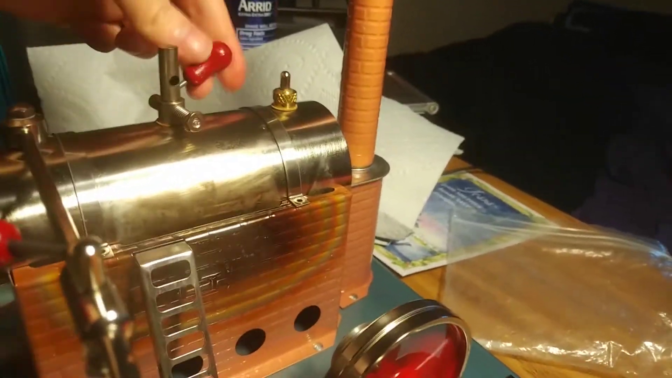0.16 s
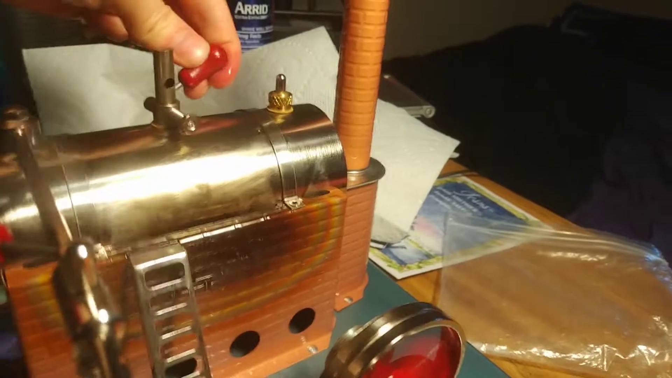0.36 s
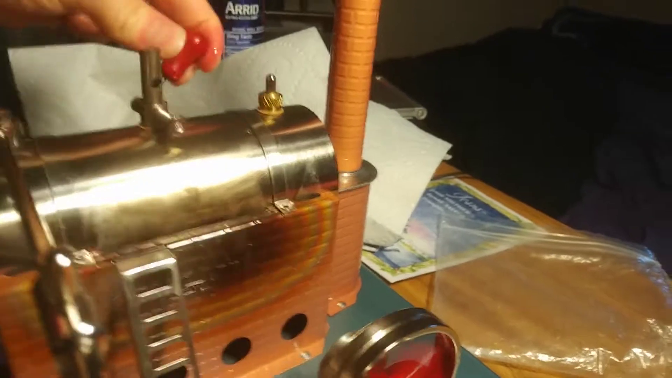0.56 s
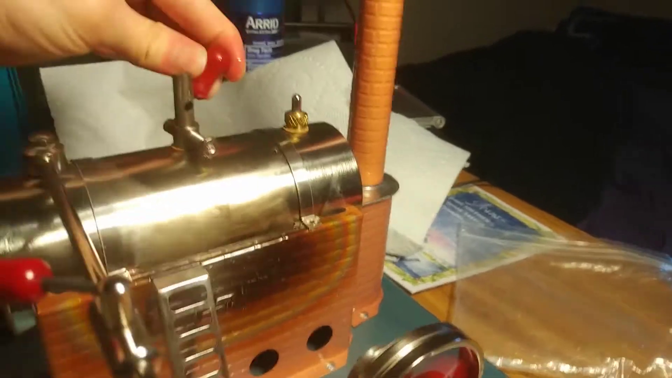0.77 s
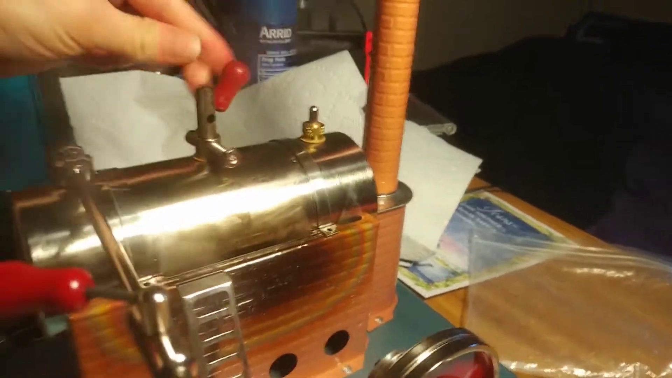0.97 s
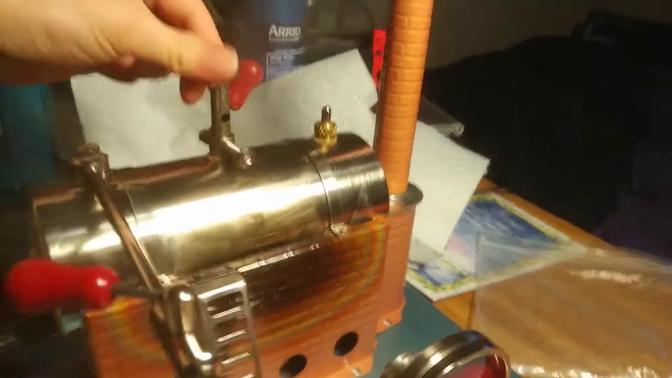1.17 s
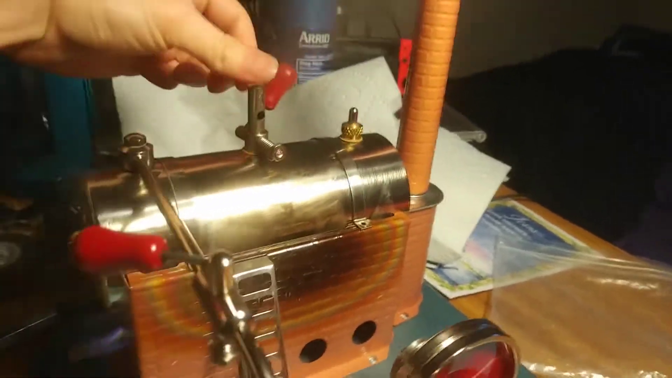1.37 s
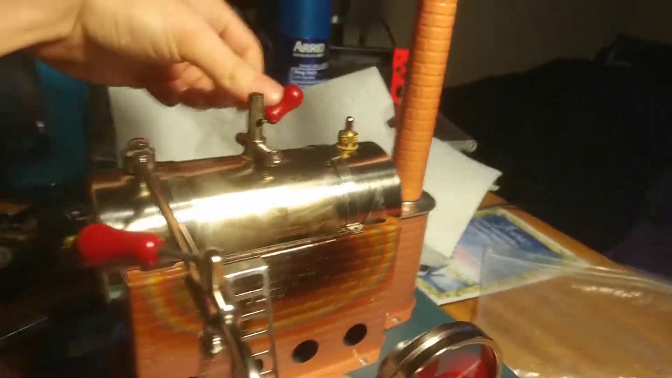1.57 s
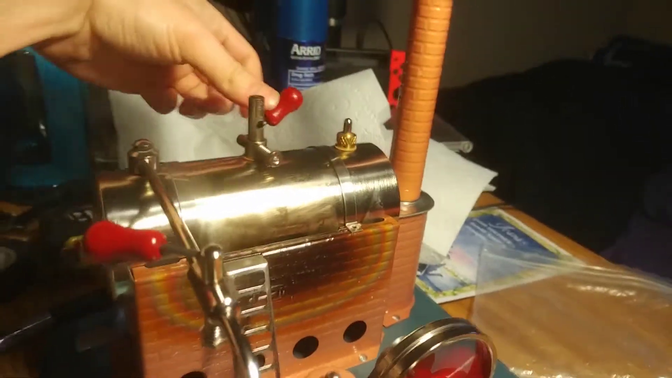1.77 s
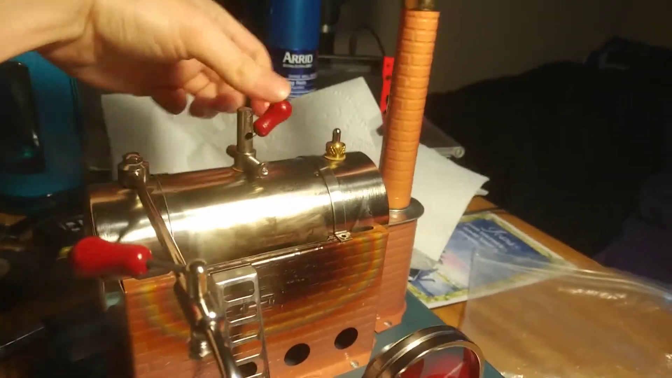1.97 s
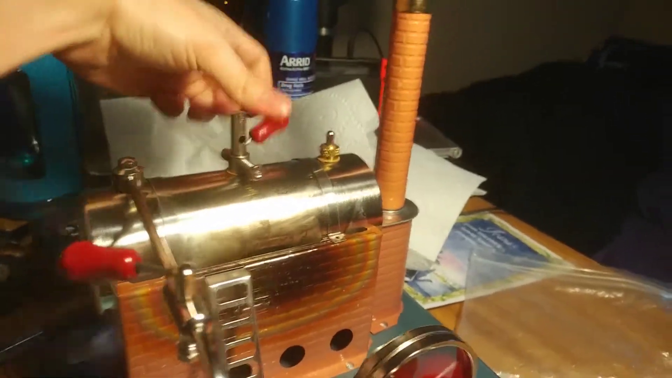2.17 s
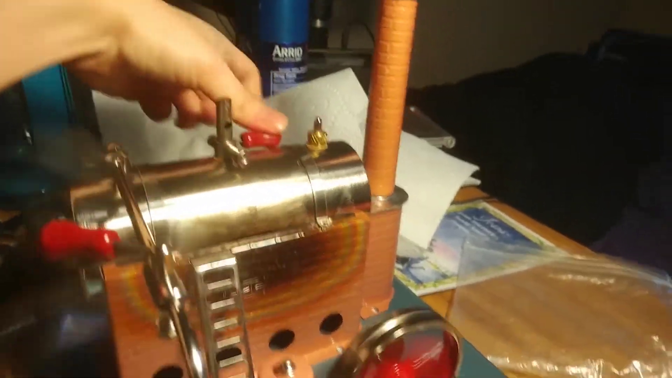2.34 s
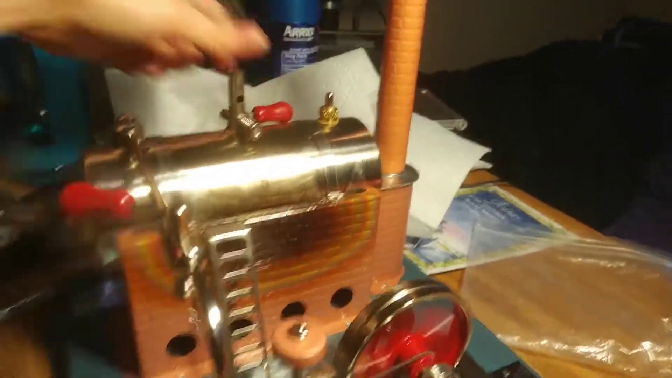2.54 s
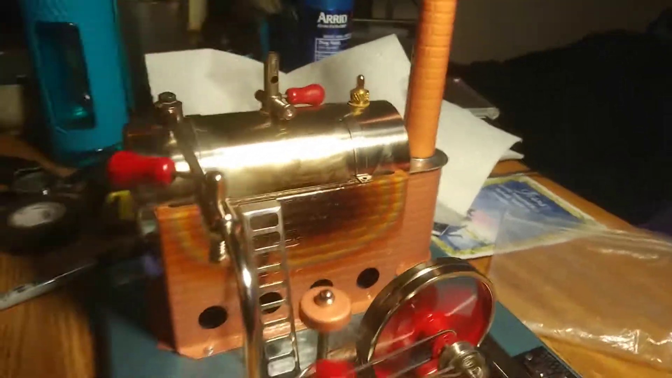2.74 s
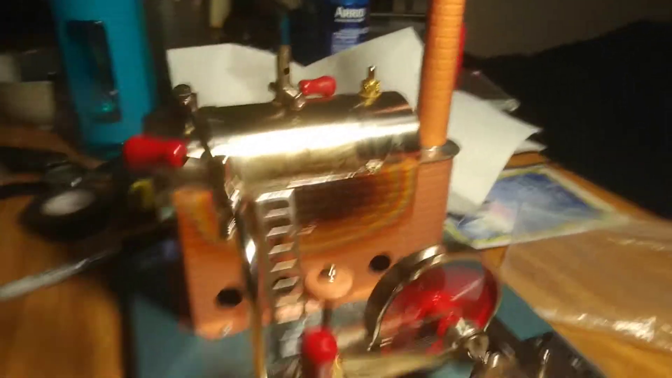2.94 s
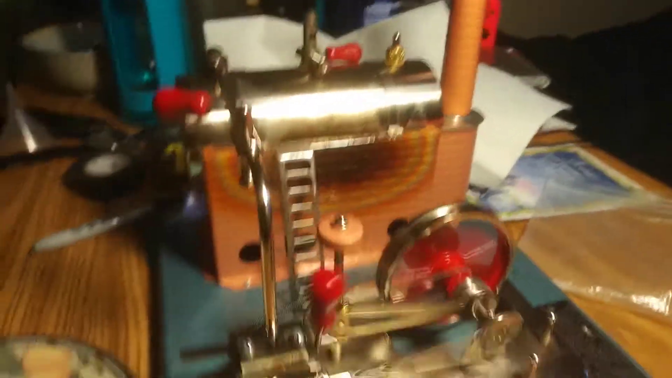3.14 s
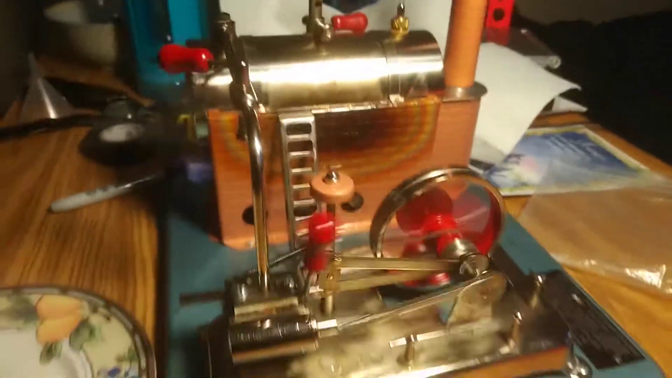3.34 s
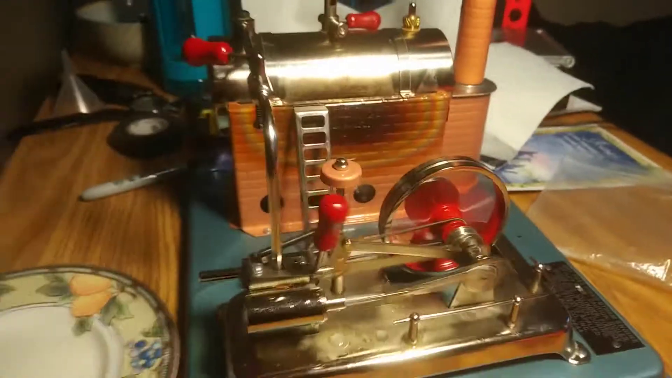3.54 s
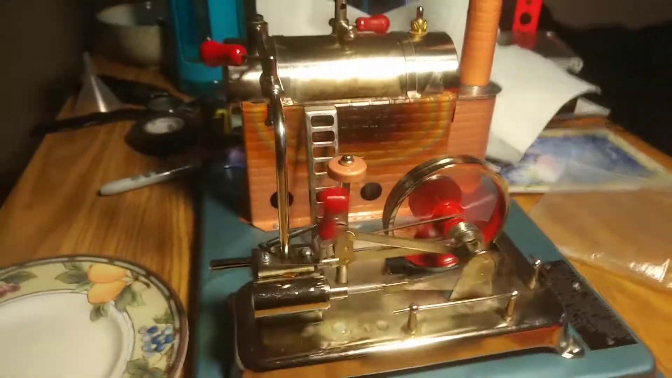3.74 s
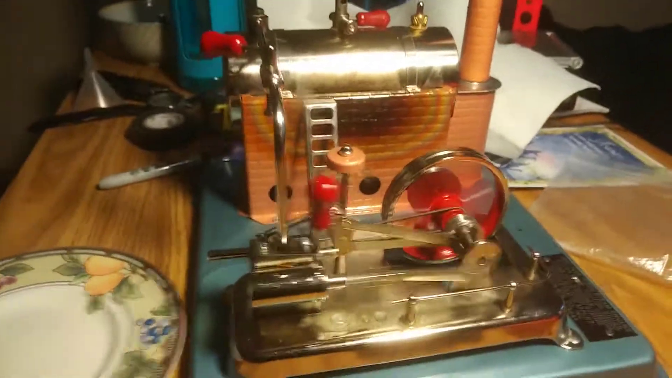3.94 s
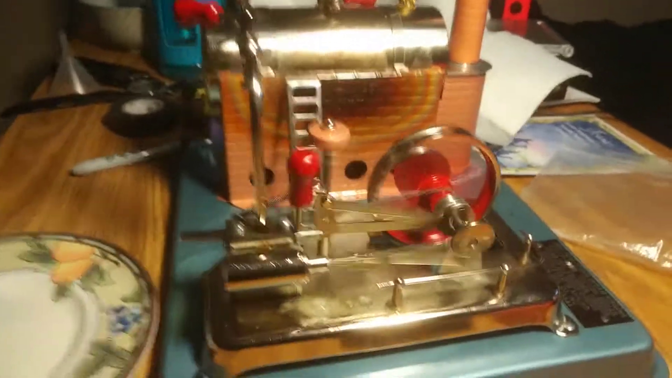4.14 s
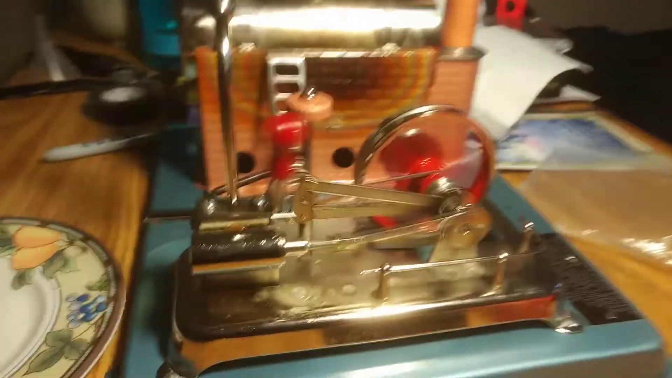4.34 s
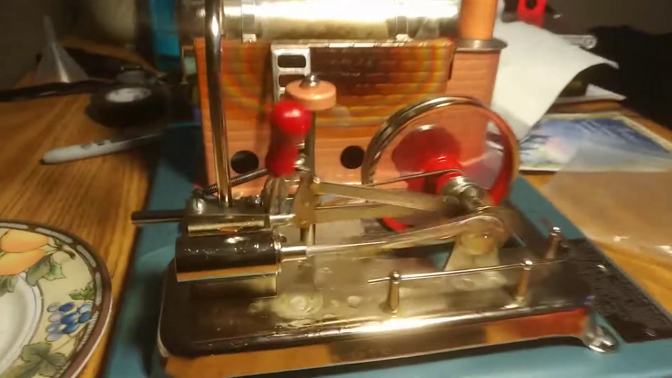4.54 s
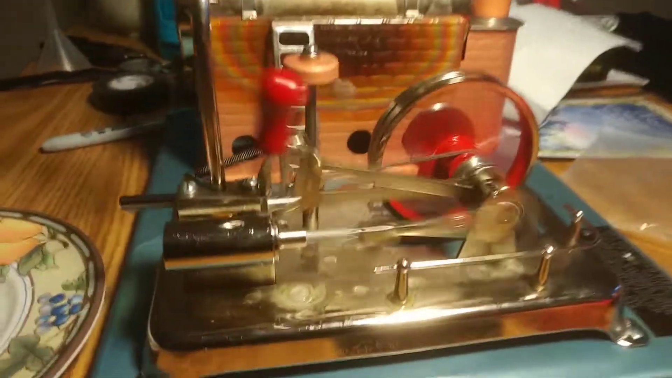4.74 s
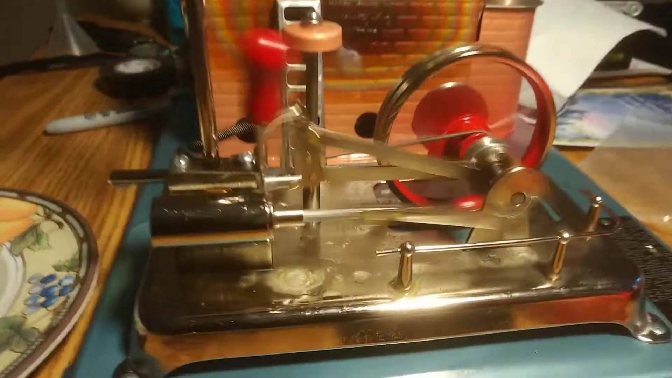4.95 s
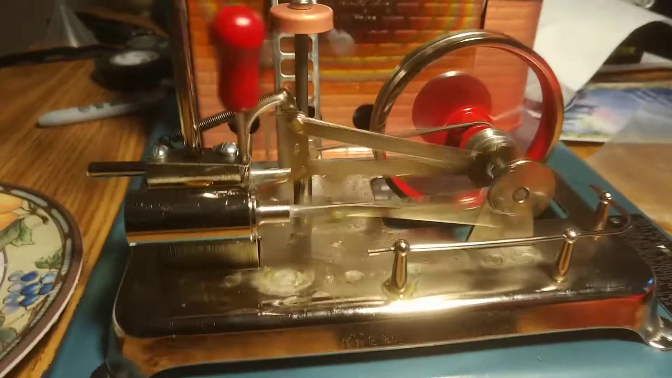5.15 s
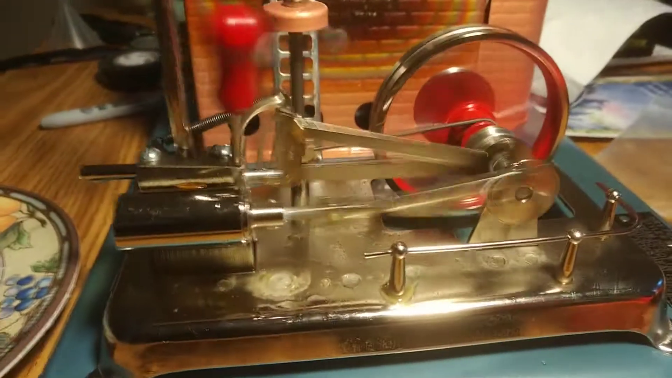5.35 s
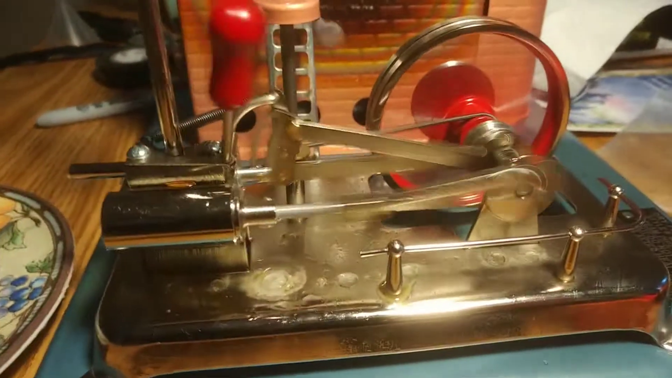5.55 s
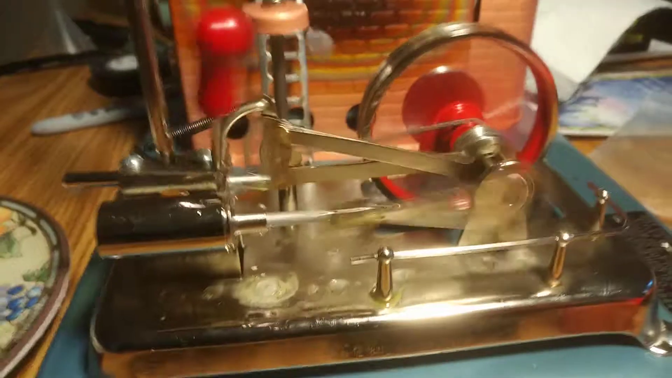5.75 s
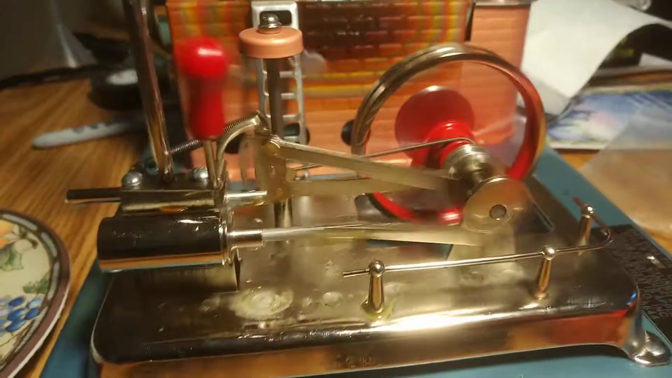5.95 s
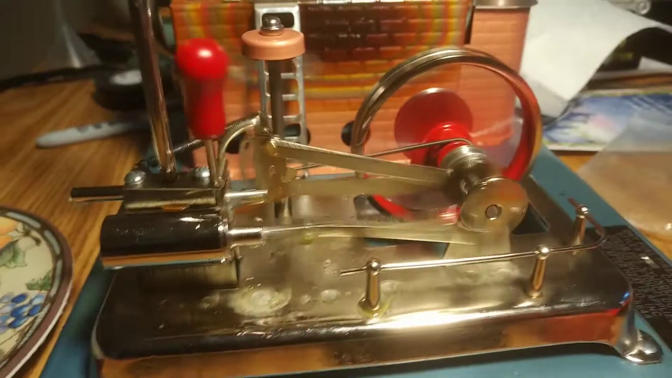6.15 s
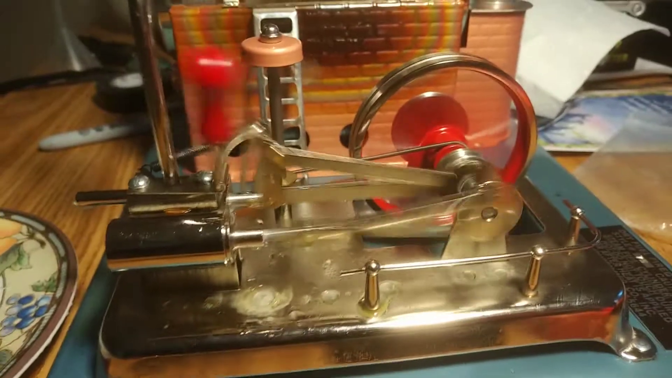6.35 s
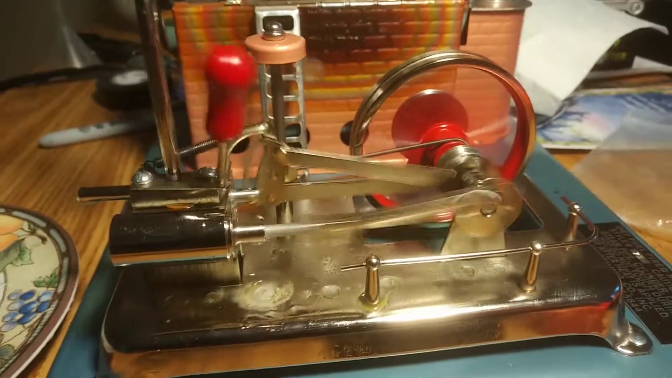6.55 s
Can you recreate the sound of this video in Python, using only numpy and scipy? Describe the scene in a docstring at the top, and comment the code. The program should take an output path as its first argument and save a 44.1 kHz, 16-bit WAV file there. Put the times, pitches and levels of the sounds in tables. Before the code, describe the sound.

A toy steam engine runs on a wooden table, heard very close, with quick, even puffs of steam and light metallic knocks over a faint bubbling boiler and low rumble. It spits a few times, then its whistle gives one loud, shrill, hissing blast of about a second. A lever clicks softly shut, and the engine runs on, its tinny knocking now more prominent.

```python
"""Toy steam engine and whistle

A toy steam engine runs on a wooden table at about eleven turns a second, heard from very close.
Each turn knocks the tin base and lets out two puffs of steam, over a bubbling boiler and table rumble.
A hand opens the whistle: it spits, then the jet drives its pipe into a shrill tone for almost a second,
ducking the mix through a limiter. The lever clicks shut and the engine runs on."""
import sys
import numpy as np
from scipy import signal
from scipy.io import wavfile
from scipy.ndimage import uniform_filter1d, minimum_filter1d

SR = 44100
rng = np.random.default_rng(int(sys.argv[2]) if len(sys.argv) > 2 else 0)


def generate_wav(signal):
    """Clip the signal to [-1, 1] and save it as 16-bit WAV at the path in sys.argv[1]."""
    frames = np.transpose(np.atleast_2d(signal))
    scaled = np.clip(frames, -1, 1) * 32767
    pcm = np.round(scaled).astype(np.int16)
    wavfile.write(sys.argv[1], SR, pcm)


N = 291501
TIME = np.arange(N) / SR


# flywheel tempo, sagging once the whistle has drawn steam: t/s, speed/(turns per s)
FLYWHEEL_SPEED = [(.6, 11.228), (1.4, 11.044), (2.8, 11.102), (3.7, 10.907), (5.2, 11.003), (6, 10.88)]
def flywheel():
    """Turns done since the first knock."""
    speed, = in_time(FLYWHEEL_SPEED)
    turns = np.cumsum(speed) / SR
    first_knock_s = .0266
    return turns - np.interp(first_knock_s, TIME, turns)


# knock pattern of one turn: position/turns, level/dB, timing scatter/s
CRANK_CONTACTS = [(0, 0, .0003), (.155, -9, .001), (.33, -18, .003), (.55, -14, .003), (.66, -10, .0012),
                  (.77, -10, .002)]
# tin base modes: f/Hz, level/dB, t60/s, left-right/dB
BASE_MODES = [(148.6, -37, 0.137, -4), (231, -25.5, 0.071, 5), (275, -10, 0.1, 4), (377, -49, 0.24, 4.5),
              (497, -13, 0.12, 12), (584, -11.5, 0.34, -4), (631.8, 4, 0.08, 1.5),
              (679.7, -9.5, 0.13, -12.5), (790, -45.5, 0.0259, 10), (1034.5, -11, 0.054, 5.5),
              (1085, -11.5, 0.0557, -7), (1242, -52, 0.027, -4.5), (1460, -17.5, 0.046, -15.5),
              (1700, -17.5, 0.028, -6.5), (2250, -15.5, 0.055, -15), (2890, -15, 0.015, -15.5)]
# firebox wall modes: f/Hz, level/dB, t60/s, left-right/dB
FIREBOX_MODES = [(260.8, -6.5, .15, -1), (649, -3, 0.41, 9), (717, 1, 0.055, 16), (829, -6, 0.025, -0.5)]
def crank(knock_db):
    """Play in crank and rod is taken up every turn, knocking the tin base and the firebox wall."""
    turns = flywheel()
    position, level_db, scatter_s = np.transpose(CRANK_CONTACTS)
    starts = np.interp(np.arange(turns[-1]), turns, TIME)
    shape = (len(starts), len(position))
    times = starts[:, None] + position * np.mean(np.diff(starts)) + scatter_s * rng.standard_normal(shape)
    sizes = from_db(level_db + .5 * rng.standard_normal(shape))
    thud = rms_one(metal_body(BASE_MODES, times, sizes, contact_hz=1620))
    # the blow spreads into the plate, whose ring swells over a few milliseconds
    bloom = rms_one(ring(thud, hz=663, t60=0.014))
    thud = rms_one(thud + from_db(-1) * bloom)
    wall = rms_one(metal_body(FIREBOX_MODES, times, sizes, contact_hz=1220))
    wall = wall * from_db(swing(at_boiler=6.5, at_crank=-20))
    # the hardest contact adds a small metallic tick
    tick_envelope = rms_one(soften(clicks_at(starts, sizes[:, 0]), hz=69))
    tick = soften(tick_envelope * noise(AIR_COLOUR, flicker_db=0.5), hz=7100)
    reverb = from_db(-13) * room(thud[0])
    return from_db(knock_db) * (thud + wall + reverb) + from_db(-64) * tick


# stray accents: t/s, level/dB
ROD_KNOCKS = [(2.545, -40), (3.51, -32.5), (3.539, -44), (5.248, -31.5), (5.883, -30.5), (6.19, -34)]
def rod_knocks():
    """Now and then the rod hits harder and rings the tin base."""
    return struck(BASE_MODES, ROD_KNOCKS)


# one puff per stroke: position/turns, level/dB
PUFFS = [(.22, 0), (.67, -4.5)]
# spectrum of wet steam: f/Hz, density/dB
STEAM_COLOUR = [(1500, 3), (3000, -22), (4800, -10), (6200, -17.5), (7600, -5.5), (10000, 3), (13000, 4.5),
                (16000, 2.5)]
def exhaust(exhaust_db):
    """The valve lets out a strong and a weaker puff each turn; droplets make them sputter."""
    rise_s, burst_s = .0045, .005
    tail_share, tail_db_per_s = from_db(-4.5), 210
    speed, = in_time(FLYWHEEL_SPEED)
    turns, power = flywheel(), 0
    for position, db in PUFFS:
        since_s = (turns - position) % 1 / speed
        until_s = (position - turns) % 1 / speed
        # a puff rises and bursts, then the cylinder empties more slowly
        rise = np.exp(-(until_s / rise_s) ** 2)
        burst = (1 - tail_share) * np.exp(-(since_s / burst_s) ** 2)
        tail = tail_share * from_db(-tail_db_per_s * since_s)
        power = power + (from_db(db) * np.maximum(burst + tail, rise)) ** 2
    sharpness = swing(at_boiler=1.3, at_crank=1.0)
    envelope = np.sqrt(power) ** sharpness
    # a sharper puff carries the same steam in less time
    four_turns = round(4 * SR / speed.mean())
    envelope = envelope / np.sqrt(uniform_filter1d(envelope ** 2, size=four_turns))
    sputter = rms_one(from_db(1.06 * drift(380) + 0.97 * drift(18.1)))
    steam = metal_reflections(noise(STEAM_COLOUR, flicker_db=1.8))
    return from_db(exhaust_db) * envelope * sputter * steam


# pitch curve, following the hand on the lever: t/s, f/Hz
WHISTLE_PITCH = [(.635, 4680), (.657, 5140), (.685, 5057), (.707, 5378), (.745, 5156), (.772, 5200),
                 (.81, 5724), (.885, 5754), (.94, 5549), (1.06, 5615), (1.1, 5570), (1.45, 5461)]
# the room's standing waves move the tone between the ears: t/s, left level/dB, left lead/rad
WHISTLE_WANDER = [(.68, -9.5, 1.34), (.78, -9.5, 1.54), (.85, -12, -2), (.945, -5, 2.45), (1.02, -3.5, 0.3),
                  (1.21, -7, 0.45), (1.3, -5, -3), (1.37, -17, -7.5), (1.46, -9, -5)]
def whistle():
    """A short pipe sings on the steam jet: louder when driven sharp, hoarse at low pressure."""
    speaks_s, attack_s, silent_s, release_s = .635, 0.058, 1.497, 0.045
    tone_db, reference_hz, db_per_khz, droop_hz = 3, 5466, 10, 1740
    hz, = in_time(WHISTLE_PITCH)
    left_db, left_lead = in_time(WHISTLE_WANDER)
    dying = ramp(silent_s - release_s, release_s)
    drive = ramp(speaks_s, attack_s) ** 2 * (1 - dying ** 2)
    hz = hz - droop_hz * dying ** 2.9
    envelope = drive * from_db(tone_db + db_per_khz * (hz - reference_hz) / 1000)
    hoarse = np.clip(1 - envelope, 0, 1) ** 2
    jitter_hz = (10 + 170 * hoarse) * drift(475.4)
    phase = 2 * np.pi * np.cumsum(hz + jitter_hz) / SR
    envelope = envelope * from_db((1.34 + 2 * hoarse) * drift(134.1))
    tone = envelope * np.sin(phase)
    # in mid blast the level on the right dips briefly at random
    mid_blast = soften((TIME > .9) & (TIME < 1.22), hz=30.04)
    falter_db = 13 * mid_blast * np.maximum(drift(45) - .5, 0)
    left = from_db(left_db) * envelope * np.sin(phase + left_lead)
    right = from_db(-falter_db) * tone
    octave = envelope * np.sin(2 * phase + drift(100)) * from_db(-40.5 + 3 * drift(30))
    reverb = from_db(-17.5) * pan(-13) * room(tone)
    return np.array([left, right]) + octave + reverb


VALVE_OPEN_S, VALVE_CLOSED_S = 0.55, 1.516
# spectrum of the jet: f/Hz, density/dB
JET_COLOUR = [(1000, -30.5), (2500, -10), (3700, -6.5), (4500, -4.5), (5500, 8), (6500, 2.5), (7500, -2.5),
              (9800, 0), (11200, -6), (12300, 6), (14500, 2), (16000, -3)]
# stereo placement of the jet: f/Hz, left-right/dB
JET_BALANCE = [(1000, 0.5), (3000, -8), (4500, -9.5), (6500, -14), (8200, -8), (9500, -5.5), (13000, -0.5),
               (15000, 5)]
# upper resonances of the pipe: f/Hz, level/dB, t60/s
PIPE_OVERTONES = [(9010, -17, .08), (10980, -16, .03), (11250, -13, .015), (12750, -17, .06),
                  (14250, -15, .015)]
# breathy rushes through the half-open valve: t/s, level/dB, half width/s, f/Hz
VALVE_GASPS = [(0.559, -34, 0.017, 5860), (0.601, -24.5, 0.017, 6025), (.655, -26, 0.03, 4570),
               (0.676, -19.5, 0.032, 5180), (1.493, -25.5, 0.042, 5170)]
def jet():
    """Steam hisses over the whistle's lip and stirs the pipe; it gasps as the valve opens and shuts."""
    opening_s, closing_s = 0.16, .1
    eased_open = 1 - np.exp(-np.maximum(TIME - VALVE_OPEN_S, 0) / opening_s)
    valve = eased_open * (1 - ramp(VALVE_CLOSED_S - closing_s, closing_s))
    pipe = sum(from_db(db) * pipe_noise(hz, t60) for hz, db, t60 in PIPE_OVERTONES)
    hiss = metal_reflections(noise(JET_COLOUR, flicker_db=4, balance=JET_BALANCE)) + pipe
    gasps = sum(from_db(db) * np.exp(-((TIME - s) / width) ** 2) * pipe_noise(hz, t60=0.016)
                for s, db, width, hz in VALVE_GASPS)
    return valve * from_db(-21.5 + 0.88 * drift(143)) * hiss + pan(-12) * low_cut(gasps, hz=3500)


# wet bursts ahead of the whistle: t/s, level/dB, decay/s
SPITS = [(.038, -18, .019), (.108, -27, .014), (.134, -30, .014), (.174, -25.5, .01)]
def spits():
    """Condensed water is blown out of the valve in short bursts."""
    bursts = sum(from_db(db) * ramp(s, 0.0051) * np.exp(-np.abs(TIME - s) / decay)
                 for s, db, decay in SPITS)
    sputter = from_db(1.2 * drift(340))
    return bursts * sputter * noise(STEAM_COLOUR, flicker_db=2.5)


# whistle lever modes: f/Hz, level/dB, t60/s, left-right/dB
LEVER_MODES = [(2820, 7.5, 0.032, -14), (3000, 1, .05, -5), (3600, 4, 0.021, -15), (4380, 6, .015, -11),
               (5440, -2, .03, -23), (7030, -13, .025, -3), (7500, 0, .02, 0)]
# hits on the lever: t/s, level/dB
LEVER_CLICKS = [(2.272, -48), (2.297, -43), (2.306, -45.5), (2.566, -47.5)]
# hit on the boiler: t/s, level/dB
BOILER_BUMPS = [(2.0494, -38.5)]
def hand():
    """The hand bumps the boiler, then the lever clicks shut and settles."""
    return struck(BOILER_MODES, BOILER_BUMPS) + struck(LEVER_MODES, LEVER_CLICKS)


# modes of the boiler shell and fittings: f/Hz, level/dB, t60/s, left-right/dB
BOILER_MODES = [(595, 17, 0.017, 12), (710, -8, 0.069, 5), (1001, 8, 0.088, 6), (1070, 10, 0.0454, -7.5),
                (1210, -16.5, 0.121, -8.5), (1539, -2, 0.074, -9.5), (1695, -1.5, 0.063, -8.5),
                (2292, -1.5, 0.052, -17), (2690, -1.5, 0.0506, -11.5)]
def boil(boil_db, bubbles=5000, right_lag_s=0.00028):
    """Bubbles collapse against the boiler shell; the sound reaches the left ear first."""
    times = rng.uniform(0, N / SR, bubbles)
    sizes = from_db(np.minimum(rng.exponential(1, bubbles), 2)) * rng.choice([-1, 1], bubbles)
    shell = metal_body(BOILER_MODES, times, sizes, contact_hz=1550)
    # small bubbles hardly move the lowest modes
    left, right = from_db(boil_db) * rms_one(low_cut(shell, hz=900))
    return np.array([left, np.interp(TIME - right_lag_s, TIME, right)])


# spectrum of the table's rumble: f/Hz, density/dB
RUMBLE_COLOUR = [(30, -28.5), (42, -37), (63, 6), (95, -9.5), (140, 4), (190, -3.5), (300, -4.5), (450, -9),
                 (630, -1), (830, -12), (1030, -7.5), (1400, -19), (2300, -20.5), (4000, -31.5)]
# hum partials in the wood: f/Hz, level/dB
TABLE_HUM = [(120, -52), (146, -52), (361, -53.5)]
def table_rumble():
    """The running engine shakes the table into a rumble and a wavering hum."""
    rumble = from_db(-39) * noise(RUMBLE_COLOUR, flicker_db=.5)
    hum = sum(from_db(db) * np.sqrt(2) * np.sin(2 * np.pi * hz * TIME + 0.95 * drift(1.4))
              for hz, db in TABLE_HUM)
    return rumble + from_db(1.5 + 2.5 * drift(0.82)) * hum


# spectrum of the airy hiss, also used for the crank's tick: f/Hz, density/dB
AIR_COLOUR = [(1500, 6.5), (3000, 1), (4500, -3), (5550, -10), (6500, 11.5), (10000, -17), (16000, -1.5)]
def leak():
    """A faint bed of hiss; steam seeps through the whistle, less once the lever is pushed home."""
    seating_s, seep_db = (2.1, 2.7), (-55.5, -63)
    seep = from_db(np.interp(TIME, seating_s, seep_db)) * pan(-15.5) * pipe_noise(hz=5525, t60=0.0056)
    return seep + from_db(-52) * noise(AIR_COLOUR, flicker_db=5.5)


# early reflections: delay/s, gain
METAL_REFLECTIONS = [(.00042, 0.14), (.00113, 0.11), (.00187, -.35), (.0031, .3), (.0053, 0.36)]
def metal_reflections(x):
    """Nearby polished metal returns the hiss and combs its treble; the power is kept."""
    out = x.copy()
    for delay_s, gain in METAL_REFLECTIONS:
        lag = max(1, round(delay_s * SR))
        out[:, lag:] += gain * x[:, :-lag]
    return out * np.std(x) / np.std(out)


def room(x, count=20, t60=0.39):
    """Short room tail: feedback delays of unrelated lengths, half of them on each side."""
    out = np.zeros((2, N))
    for k, lag in enumerate((rng.uniform(.007, 0.12, count) * SR).astype(int)):
        loop = x.copy()
        feedback = np.exp(-np.log(1000) * lag / SR / t60)
        for i in range(lag, N, lag):
            loop[i:i + lag] += feedback * loop[i - lag:i][:N - i]
        out[k % 2] += (loop - x) * (-1) ** (k // 2)
    return out / np.sqrt(count)


# stereo width of the noise layers: f/Hz, left-right correlation
NOISE_CORRELATION = [(60, .96), (300, .92), (700, .88), (1400, .1), (3000, 0), (5000, .1), (7000, .55),
                     (15000, .6)]
# their default placement: f/Hz, left-right/dB
NOISE_BALANCE = [(60, 2), (200, 1), (600, 5), (1300, -6.5), (2400, -7), (4400, -12), (8100, -3),
                 (11000, -1.5), (15000, 3)]
def noise(colour, flicker_db, balance=NOISE_BALANCE):
    """Third-octave bands of stereo noise, each with its own level, flicker, pan and width; mid rms 1."""
    edges = 16500 / 2 ** (np.arange(29, -1, -1) / 3)
    out, white = 0, rng.standard_normal((2, 2, N))
    for k, (low, high) in enumerate(zip(edges, edges[1:])):
        hz = np.sqrt(low * high)
        if colour[0][0] < hz < colour[-1][0]:
            band = signal.butter(2, [low, high], "band", fs=SR, output="sos")
            mid, side = signal.sosfilt(band, white[k % 2])
            alike = at_hz(NOISE_CORRELATION, hz)
            pair = np.sqrt(1 + alike) * mid + np.sqrt(1 - alike) * side * [[1], [-1]]
            level_db = at_hz(colour, hz) + flicker_db * drift(21.2)
            out = out + pair * pan(at_hz(balance, hz)) * from_db(level_db)
    return out / np.sqrt(np.mean(out.mean(axis=0) ** 2))


def metal_body(modes, times, sizes, contact_hz):
    """Blows ring a metal part; each meets every mode with a strength of its own."""
    out = 0
    for hz, level_db, t60, side_db in modes:
        strengths = sizes * from_db(level_db + rng.standard_normal(np.shape(sizes)))
        out = out + pan(side_db) * ring(clicks_at(times, strengths), hz, t60)
    return soften(out, contact_hz)


def struck(modes, blows):
    """Single hard blows on a metal part."""
    times, level_db = np.transpose(blows)
    return metal_body(modes, times, from_db(level_db), contact_hz=5000)


def pipe_noise(hz, t60):
    """Turbulence stirring one resonance; rms 1."""
    return rms_one(ring(rng.standard_normal(N), hz, t60))


def ring(clicks, hz, t60):
    """A unit click sets a sine of height 1 ringing."""
    r = np.exp(-np.log(1000) / (t60 * SR))
    w = 2 * np.pi * hz / SR
    return signal.lfilter([0, np.sin(w)], [1, -2 * r * np.cos(w), r * r], clicks + 1e-18)


def clicks_at(times, sizes):
    """A train of single-sample blows."""
    at = np.round(np.ravel(times) * SR).astype(int)
    inside = (at >= 0) & (at < N)
    return np.bincount(at[inside], np.ravel(sizes)[inside], N)


def drift(hz):
    """Smooth random modulation with spread 1."""
    hop, warm_up = 20, 2000
    r = np.exp(-2 * np.pi * hz * hop / SR)
    white = rng.standard_normal(N // hop + warm_up + 2)
    slow = signal.lfilter([1], [1, -2 * r, r * r], white)[warm_up:]
    return np.interp(np.arange(N) / hop, np.arange(len(slow)), rms_one(slow))


def soften(x, hz):
    """One-pole low-pass."""
    r = np.exp(-2 * np.pi * hz / SR)
    return signal.lfilter([1 - r], [1, -r], x + 1e-18)


def low_cut(x, hz):
    """Two-pole high-pass."""
    return signal.sosfilt(signal.butter(2, hz, "high", fs=SR, output="sos"), x)


def swing(at_boiler, at_crank, span_s=(1.74, 3.4)):
    """Glides a setting as the listener swings from the boiler over to the crank."""
    return np.interp(TIME, span_s, (at_boiler, at_crank))


def ramp(start_s, length_s):
    """Linear fade from 0 to 1."""
    return np.clip((TIME - start_s) / length_s, 0, 1)


def in_time(rows):
    """Each column of an automation curve, at every sample."""
    times, *columns = np.transpose(rows)
    return [np.interp(TIME, times, column) for column in columns]


def at_hz(points, hz):
    """A spectrum read on a log-frequency axis."""
    f, value = np.transpose(points)
    return np.interp(np.log(hz), np.log(f), value)


def pan(db):
    """Left and right gains for a level difference; positive is left."""
    return from_db(np.array([[db], [-db]]) / 2)


def from_db(db):
    return 10 ** (np.asarray(db) / 20)


def rms_one(x):
    return x / np.sqrt(np.mean(x ** 2) + 1e-20)


# fader ride as the listener draws back and leans in: t/s, level/dB
NEARNESS = [(0, -0.5), (1.6, -2), (2.5, 0.5), (3.3, 0.05), (4.1, -2), (5.2, 1.5), (5.8, 0.4), (6.6, 0.1)]
def scene():
    """The mix. Whistling costs pressure: the puffs weaken and the water boils up for a while."""
    pressure_loss_db, surge_db, settle_s = 2.5, 7, 0.61
    near_db, = in_time(NEARNESS)
    vented = ramp(VALVE_OPEN_S, VALVE_CLOSED_S - VALVE_OPEN_S)
    surge = vented ** 2 * np.exp(-np.maximum(TIME - VALVE_CLOSED_S, 0) / settle_s)
    knock_db = swing(at_boiler=-45.5, at_crank=-37.5) + near_db
    exhaust_db = swing(at_boiler=-38.5, at_crank=-41) - pressure_loss_db * vented + near_db
    boil_db = -45.5 + surge_db * surge + near_db
    engine = crank(knock_db) + rod_knocks() + exhaust(exhaust_db) + table_rumble()
    boiler = hand() + boil(boil_db) + from_db(near_db) * leak()
    return engine + boiler + whistle() + jet() + spits()


def limit(x, ceiling_db, release_db_per_s, link):
    """A fast limiter on each channel, partly tied to the other."""
    over_db = np.maximum(20 * np.log10(np.abs(x) + 1e-9) - ceiling_db, 0)
    release_db = release_db_per_s * TIME
    cut_db = np.maximum.accumulate(over_db + release_db, axis=1) - release_db
    cut_db = cut_db + link * (cut_db.max(axis=0) - cut_db)
    return x * from_db(uniform_filter1d(minimum_filter1d(-cut_db, size=65), size=65))


def record(dry):
    """A limiter holds the whistle down, then a steep low-pass trims the top."""
    held = limit(dry, ceiling_db=-.15, release_db_per_s=250, link=.5)
    cutoff_hz = 15900
    return signal.sosfiltfilt(signal.ellip(10, .05, 60, cutoff_hz, fs=SR, output="sos"), held)


dry = scene()
out = record(dry)
generate_wav(out)
```